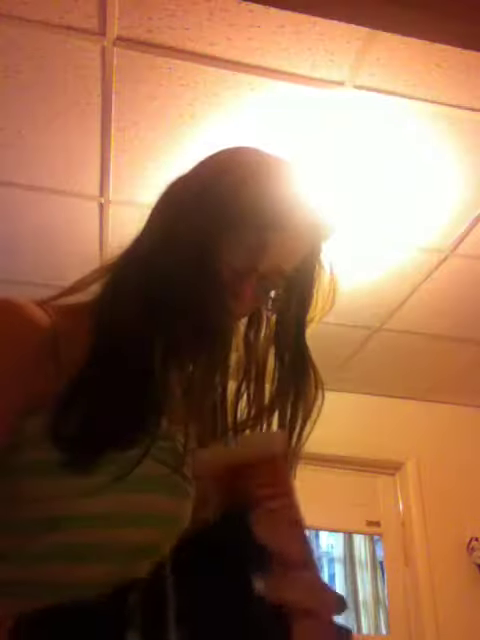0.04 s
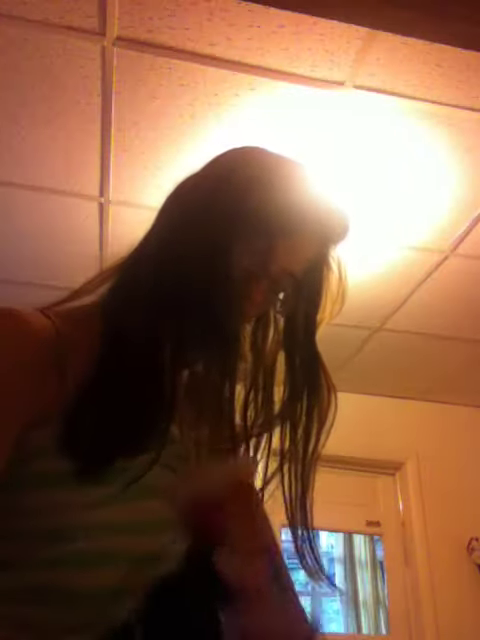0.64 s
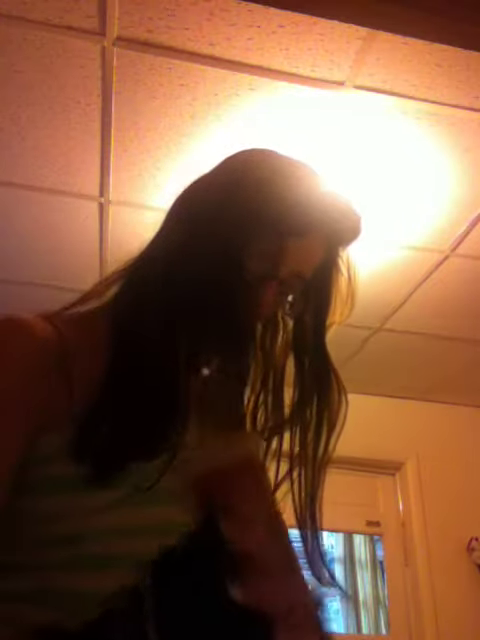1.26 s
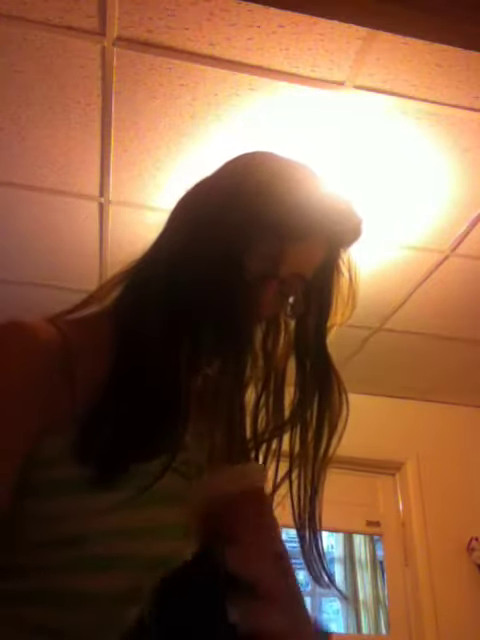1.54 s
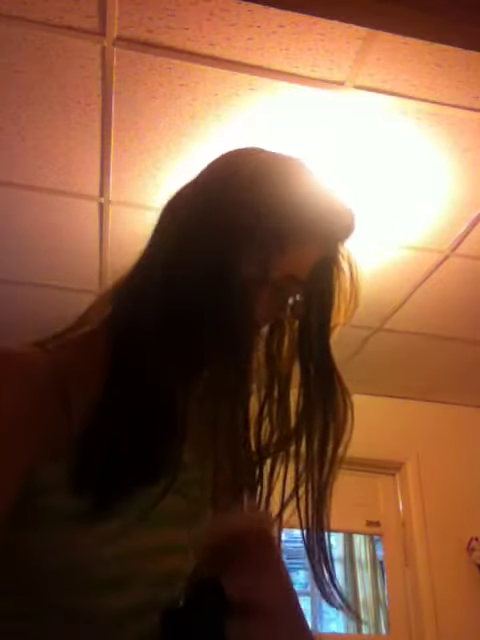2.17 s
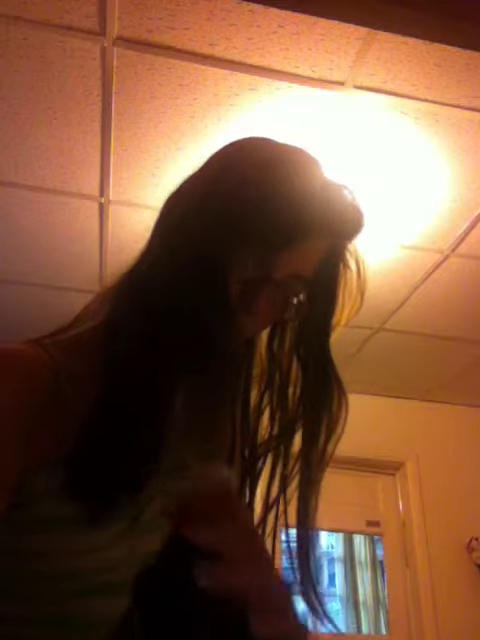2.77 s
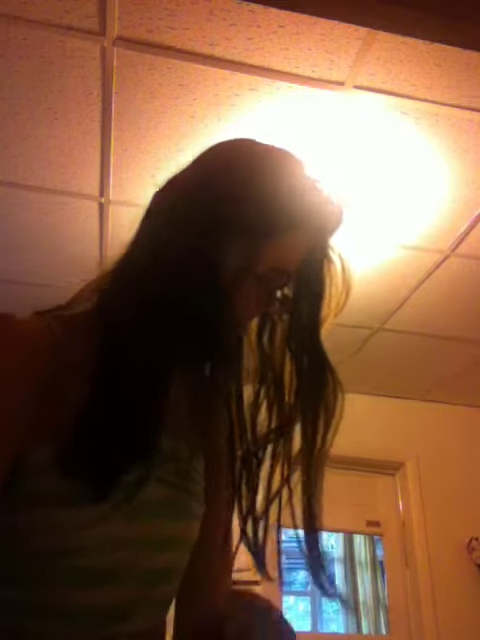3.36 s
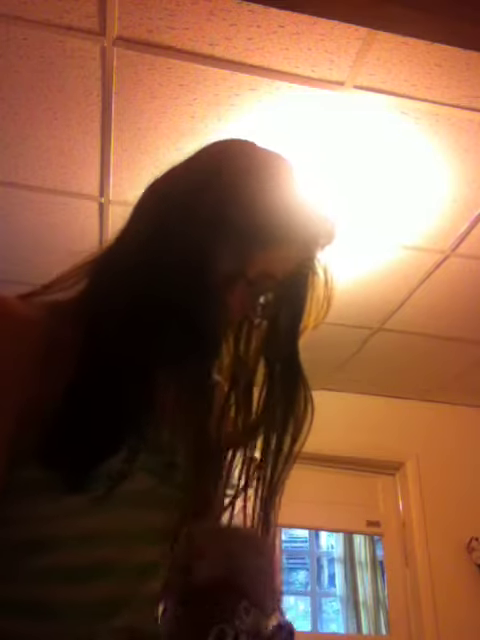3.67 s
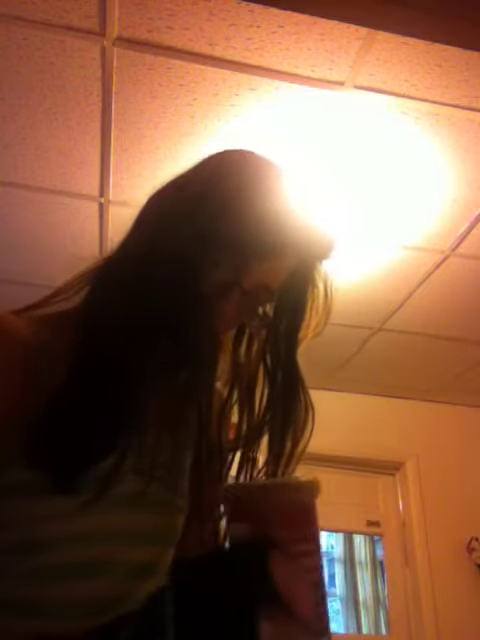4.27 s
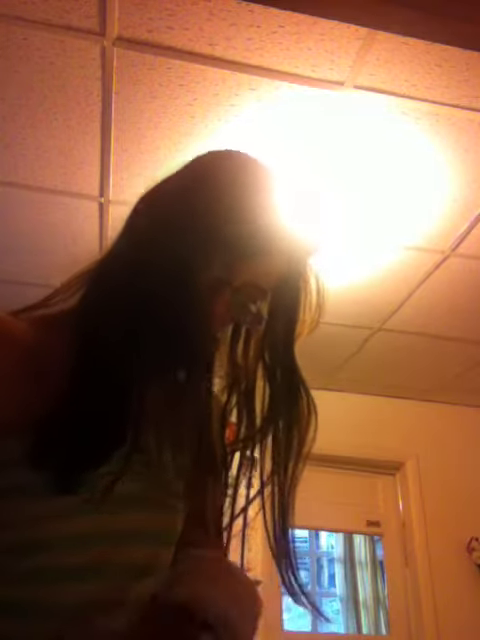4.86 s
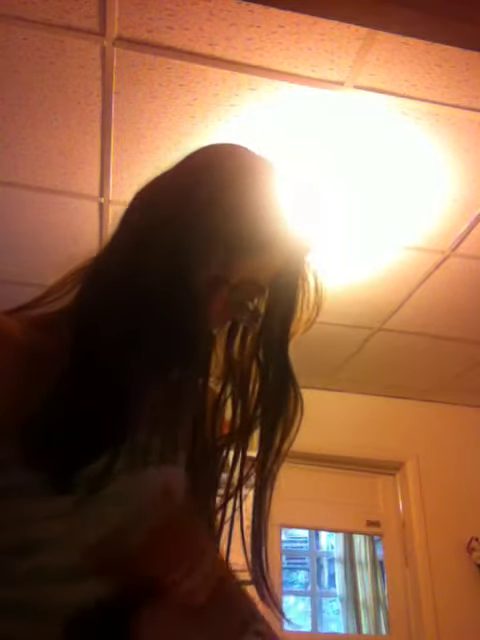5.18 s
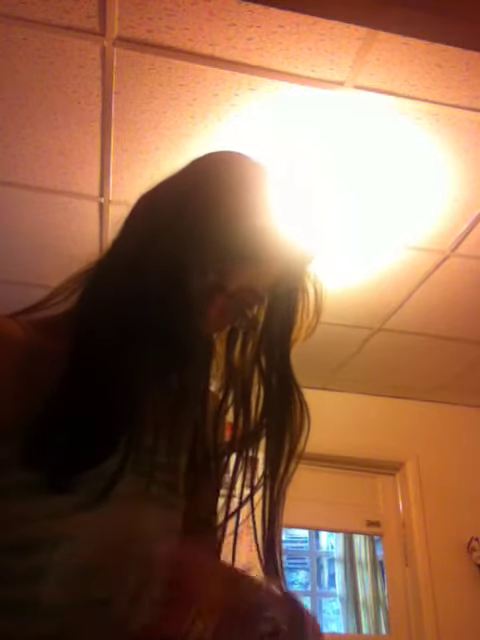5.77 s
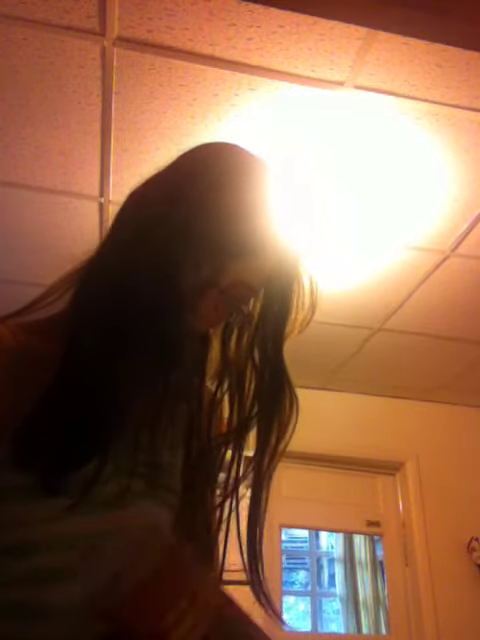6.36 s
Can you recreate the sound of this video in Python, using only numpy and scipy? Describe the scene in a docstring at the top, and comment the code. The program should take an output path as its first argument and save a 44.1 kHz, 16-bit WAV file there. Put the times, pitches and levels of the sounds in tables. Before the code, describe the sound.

A refrigerator hums low and steady throughout in a small kitchen, with a rush of air and a faint hiss. Close to the microphone, a spoon rubs against a plastic spice container in short, quiet, grainy strokes, about five a second, with faint high squeaks in the first half second. At about 1.9 seconds comes a stronger scrape and a click, followed by several light ticks and soft hand bumps until 2.4. More scrapes, brief judders and clicks bunch between 2.8 and 3.2. At 3.4 seconds one short, hollow knock rings the container, the loudest sound. From around 3.3 to 6.2 seconds, powder slides over the plastic in soft, high hisses as the container tips, with scattered ticks between 3.7 and 4.8, a small judder at 4.8 and a thin squeak near 5.9. The room adds only a slight, short echo.

```python
"""A spoon scrapes and ticks against a plastic spice container, close by in a small kitchen.
The scrapes are many tiny collisions, with a few judders and thin squeaks where the spoon sticks and slips.
The hand makes soft bumps, one hollow knock rings the container, and powder hisses as it is tipped.
A motor, likely a refrigerator, hums throughout, with a rush of air and a faint hiss."""
import sys
import numpy as np
from scipy import signal
from scipy.fft import rfft, irfft
from scipy.io import wavfile

SR = 44100
rng = np.random.default_rng(int(sys.argv[2]) if len(sys.argv) > 2 else 0)


def wrap_up_sound(samples):
    """Save the sound to the file named by the first command line argument, as 16-bit audio."""
    columns = np.atleast_2d(samples).T
    # keep every value between -1 and 1, then stretch to whole-number steps
    tamed = np.clip(columns, -1, 1)
    steps = np.round(tamed * 32767).astype(np.int16)
    wavfile.write(sys.argv[1], SR, steps)


N = 283122
T = np.arange(N) / SR


def from_db(db):
    """Turn decibels into a number to multiply by."""
    return 10 ** (np.asarray(db) / 20)


def rms_one(x):
    """Scale a sound so that its average strength (rms) is 1."""
    return x / np.sqrt(np.mean(x ** 2) + 1e-20)


def band(x, low_hz, high_hz):
    """Keep the part of a sound between two frequencies."""
    return signal.sosfilt(signal.butter(2, [low_hz, high_hz], "band", fs=SR, output="sos"), x + 1e-18)


def band_noise(low_hz, high_hz):
    """Steady noise between two frequencies, at strength 1."""
    return rms_one(band(rng.standard_normal(N), low_hz, high_hz))


def colour(x, spectrum):
    """Shape a sound's lows and highs, dropping 36 dB an octave past the table's ends; strength 1."""
    hz, db = np.transpose(spectrum)
    octave, listed = np.log2(np.fft.rfftfreq(N, 1 / SR) + 1), np.log2(hz)
    beyond = np.abs(octave - np.clip(octave, listed[0], listed[-1]))
    shape = from_db(np.interp(octave, listed, db) - 36 * beyond)
    return rms_one(irfft(rfft(x) * shape, N))


def tones(base_hz, multiples):
    """Steady pure tones at whole multiples of one frequency."""
    return sum(np.sqrt(2) * from_db(db) * np.sin(2 * np.pi * (k * base_hz * T + rng.random()))
               for k, db in multiples)


def swell(middle, length, db):
    """The rounded rise and fall of one hand movement."""
    return from_db(db) * np.exp(-np.minimum(np.abs(2 * (T - middle) / length) ** 2.24, 50))


def clicks(times, db):
    """One sharp push for each contact."""
    force = np.zeros(N)
    force[np.round(np.asarray(times) * SR).astype(int)] = from_db(db)
    return force


def burst(force, low_hz, high_hz, t60):
    """Each push sets off a puff of noise that fades by 60 dB in t60 seconds."""
    t = T[T < t60]
    tail = band(rng.standard_normal(len(t)), low_hz, high_hz) * from_db(-60 * t / t60)
    return signal.oaconvolve(force, tail / np.linalg.norm(tail))[:N]


def ring(force, hz, t60):
    """Each push sets off a pure tone that fades by 60 dB in t60 seconds."""
    decay, angle = from_db(-60 / (t60 * SR)), 2 * np.pi * hz / SR
    return signal.lfilter([0, np.sin(angle)], [1, -2 * decay * np.cos(angle), decay ** 2], force + 1e-18)


def delayed(x, delay_s):
    """The same sound, arriving later."""
    return np.interp(T - delay_s, T, x, left=0)


# The motor's magnetic hum. Each row: multiple of the mains frequency, level in dB.
MAINS_HUM = [(2, -48.5), (4, -44), (6, -62.5)]
# That hum slowly sags and rises. Each row: time in seconds, level change in dB.
HUM_DRIFT = [(0, 0), (2.4, -0.5), (4.5, 0.26), (6.4, 1.4)]
# The compressor's hum. Each row: multiple of its turning speed, level in dB.
COMPRESSOR_HUM = [(3, -58.5), (4, -65), (5, -60), (6, -54), (7, -60.5)]
# The steady rush of air. Each row: frequency in Hz, relative level in dB.
AIR_RUSH = [(25, -26), (60, -22), (125, -8), (165, -7.5), (200, 0.5), (222, -2), (243, 4), (275, -5),
            (300, -8.5), (335, -3.5), (420, -7), (465, -13), (497, -5), (530, -10.5), (690, -19),
            (760, -13.5), (850, -11), (900, -19.5), (960, -16.5), (1060, -23.5), (1620, -24), (2000, -36)]
def refrigerator(mains_hz, compressor_hz, rush_db):
    """A motor hums amid rushing air; the slightly slower compressor makes the hum pulse."""
    drift = from_db(np.interp(T, *np.transpose(HUM_DRIFT)))
    hum = tones(mains_hz, MAINS_HUM) * drift
    compressor = tones(compressor_hz, COMPRESSOR_HUM)
    fan_whine = tones(base_hz=1135, multiples=[(1, -71.5)])
    air = from_db(rush_db) * colour(rng.standard_normal(N), AIR_RUSH)
    return hum + compressor + fan_whine + air


# The background hiss. Each row: frequency in Hz, relative level in dB.
FAINT_HISS = [(1800, -5), (2400, -1), (3100, -2), (5500, -5), (10000, -4.5), (15500, -11)]
def faint_hiss(level_db):
    """An even, high noise lies behind everything."""
    return from_db(level_db) * colour(rng.standard_normal(N), FAINT_HISS)


# Fine grains rubbing on plastic. Each row: frequency in Hz, relative level in dB.
GRAIN_HISS = [(4000, -47), (5500, -22), (6500, -7), (7800, -4.5), (8700, 3), (10000, 3.5), (11500, 0),
              (13000, -4.5), (15500, -15)]
def friction(strokes, grains_per_s, grain_db, rasp_share, wall_db):
    """Many tiny collisions hiss, and a lower rasp stirs the container's wall, in swelling strokes."""
    sizes = from_db(grain_db * np.minimum(rng.exponential(1, N), 4))
    grains = rng.standard_normal(N) * sizes * (rng.random(N) < grains_per_s / SR)
    hiss = colour(grains, GRAIN_HISS)
    wall = from_db(wall_db) * rms_one(band(grains, 840, 2070))
    rasp = rms_one(band(grains, 2750, 8300)) + wall
    movement = sum(swell(*stroke) for stroke in strokes)
    return ((1 - rasp_share) * hiss + rasp_share * rasp) * movement


# Strokes of the spoon. Each row: middle in seconds, length in seconds, relative level in dB.
SPOON_STROKES = [(.152, 0.058, -52), (.222, .024, -57.5), (.394, .027, -54.5), (.613, .04, -57.5),
                 (.795, .05, -63), (.984, .031, -54.5), (1.195, 0.055, -62), (1.382, .035, -58.5),
                 (1.545, 0.034, -60), (1.715, .025, -58), (1.894, 0.035, -45), (2.055, 0.02, -61),
                 (2.25, 0.46, -66), (2.908, 0.043, -55.5), (3.035, 0.044, -52.5), (3.09, 0.075, -53),
                 (3.205, .013, -53)]
def spoon_scrapes():
    """The spoon rubs to and fro on the plastic."""
    return friction(SPOON_STROKES, grains_per_s=8700, grain_db=1.5, rasp_share=0.28, wall_db=-1.5)


# Judders along the rim. Each row: middle in seconds, length in seconds, level in dB, pitch in Hz.
RIM_JUDDERS = [(0.154, .06, -61.5, 3700), (2.787, .05, -57.5, 1450), (3.098, 0.12, -58.5, 1510),
               (3.675, 0.039, -57.5, 7000), (4.81, 0.06, -58, 1280)]
def spoon_judders(spread):
    """The spoon slips unevenly, keeping one rough note sounding for a moment."""
    return sum(swell(middle, length, db) * band_noise(hz / spread, hz * spread)
               for middle, length, db, hz in RIM_JUDDERS)


# Thin squeaks. Each row: middle in seconds, length in seconds, relative level in dB,
# how much louder the upper tone is than the lower in dB.
SPOON_SQUEAKS = [(.29, .04, -71, -3), (.475, 0.087, -65, -3), (5.905, 0.051, -62, 4)]
def spoon_squeaks(pitches_hz, width_hz):
    """The spoon sticks and slips, singing in two thin, rough tones."""
    low, high = [band_noise(hz - width_hz / 2, hz + width_hz / 2) for hz in pitches_hz]
    return sum(swell(middle, length, db) * (from_db(-tilt / 2) * low + from_db(tilt / 2) * high)
               for middle, length, db, tilt in SPOON_SQUEAKS)


# Light touches of spoon on container. Each row: start in seconds, relative level in dB,
# extra level for the bright crack in dB, pitch of the clack in Hz.
SPOON_TICKS = [(1.514, -60.5, 12, 3500), (1.8798, -35, -12, 1090), (2.052, -41.5, -11, 2280),
               (2.2231, -42, -8, 2200), (2.2353, -36, -4.5, 1980), (2.3949, -37.5, -9, 1480),
               (2.9036, -50, 5, 1600), (3.003, -33, -9, 900), (3.07, -46, 6, 1490), (3.229, -48, 1, 3000),
               (3.6665, -44, 2, 3500), (3.768, -33, -8, 1550), (4.072, -37.5, -16, 1230),
               (4.53, -51, 5, 3900), (4.79, -45, -3, 1300)]
def spoon_ticks(body_db, tail_db, crack_db, tail_t60, spread):
    """Each touch gives a bright crack and a clack that the fingers quickly deaden."""
    body = 0
    for start, db, _, hz in SPOON_TICKS:
        touch = clicks([start], db)
        clack = band(touch, hz / spread, hz * spread)
        clack *= from_db(db) / np.linalg.norm(clack)
        tail = burst(touch, hz / spread, hz * spread, tail_t60)
        body += clack + from_db(tail_db) * tail
    starts, levels_db, bright_db, _ = np.transpose(SPOON_TICKS)
    crack = burst(clicks(starts, levels_db + bright_db), 2800, 11000, t60=0.027)
    return from_db(body_db) * body + from_db(crack_db) * crack


# Bumps of the hand. Each row: middle in seconds, length in seconds, level in dB.
HAND_BUMPS = [(2.28, 0.035, -47), (2.385, .045, -51), (2.86, .1, -57), (3.412, .03, -48)]
def hand_bumps():
    """The hand makes low, soft thumps."""
    return band_noise(45, 106) * sum(swell(*bump) for bump in HAND_BUMPS)


# Slides of powder. Each row: middle in seconds, length in seconds, relative level in dB.
POWDER_SLIDES = [(3.29, .18, -56), (3.54, 0.28, -60.5), (3.77, 0.2, -54.5), (3.975, .027, -60),
                 (4.16, 0.2, -54), (4.8, .12, -52.5), (4.91, 0.1, -55), (5.27, 0.094, -57.5),
                 (5.45, 0.15, -56.5), (6.06, .21, -53)]
def sliding_powder():
    """Powder hisses over the plastic each time the container tips."""
    return friction(POWDER_SLIDES, grains_per_s=6500, grain_db=-4.5, rasp_share=0.26, wall_db=-1)


# The one hollow knock. Each row: start in seconds, relative level in dB.
KNOCK = [(3.4035, 2.5)]
# The container's own notes. Each row: pitch in Hz, relative level in dB, seconds to fade by 60 dB.
CONTAINER_NOTES = [(382, -24, 0.17), (454, -10.5, .042), (502, -6.5, 0.027), (567, -5.5, 0.026),
                   (678, -16.5, 0.084), (818, -17.5, 0.031), (956, -12, 0.016), (1130, -20, 0.021),
                   (1280, -21.5, 0.021), (1587, -21.5, 0.035), (1730, -30, .02), (2100, -26, 0.018),
                   (2292, -28, .02), (2550, -17.5, 0.019)]
def container_knock(crack_db, clack_db, thud_db):
    """A firm blow rings the whole container, with a brief crack, a clack of its walls and a dull thud."""
    force = clicks(*np.transpose(KNOCK))
    body = sum(from_db(db) * ring(force, hz, t60) for hz, db, t60 in CONTAINER_NOTES)
    body = band(body, 435, 2500)  # the blunt contact softens the highs
    crack = burst(force, 5900, 9400, t60=0.012)
    clack = burst(force, 1000, 2630, t60=0.041)
    thud = band(ring(force, 155, t60=0.062), 88, 430)
    return body + from_db(crack_db) * crack + from_db(clack_db) * clack + from_db(thud_db) * thud


# Echoes from nearby surfaces. Each row: delay in seconds, relative level in dB.
NEAR_ECHOES = [(.00597, -14.5), (0.0107, -16), (0.0214, -22), (.03557, -40)]
def kitchen_echo(x, tail_db, t60, dull_hz):
    """Sound bounces back as a few dull echoes, then a faint, short tail from the walls."""
    echoes = sum(from_db(db) * delayed(x, delay_s) for delay_s, db in NEAR_ECHOES)
    dulled = signal.sosfilt(signal.butter(1, dull_hz, fs=SR, output="sos"), echoes)
    return dulled + from_db(tail_db) * burst(delayed(x, 0.015), 680, 2800, t60)


def scene():
    """Mix the handling sounds and their echoes with the hum and hiss, in one channel."""
    handling = from_db(1.0) * spoon_scrapes() + from_db(1.6) * sliding_powder()
    handling += spoon_squeaks(pitches_hz=(10130, 11630), width_hz=230)
    handling += spoon_judders(spread=1.23)
    handling += container_knock(crack_db=-12, clack_db=-12.5, thud_db=-29)
    handling += spoon_ticks(body_db=9.5, tail_db=-1, crack_db=11, tail_t60=0.027, spread=1.3)
    background = refrigerator(mains_hz=60, compressor_hz=59.03, rush_db=-44) + faint_hiss(level_db=-63)
    room = kitchen_echo(handling, tail_db=-27, t60=0.24, dull_hz=2020)
    return (handling + room + hand_bumps() + background)[None]


def gain_control(x, threshold_db, slope, release_db_per_s):
    """A loud peak turns the volume down a little; it creeps back over seconds."""
    over_db = np.maximum(20 * np.log10(np.abs(x) + 1e-9) - threshold_db, 0)
    release_db = release_db_per_s * T
    held_db = np.maximum.accumulate(over_db + release_db, axis=-1) - release_db
    return x * from_db(-slope * held_db)


def record(dry):
    """Ease the volume after loud peaks, round the peaks off and cut the very highest sounds."""
    ceiling, cutoff_hz = 0.97, 15750
    levelled = gain_control(dry, threshold_db=-22.0, slope=0.094, release_db_per_s=5.0)
    rounded = ceiling * np.tanh(levelled / ceiling)
    return signal.sosfilt(signal.ellip(12, .1, 70, cutoff_hz, fs=SR, output="sos"), rounded)


dry = scene()
out = record(dry)
wrap_up_sound(out)
```